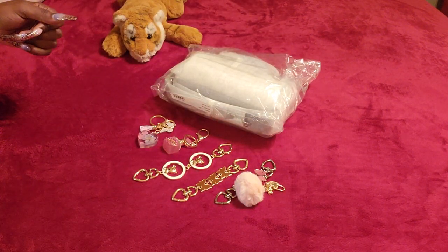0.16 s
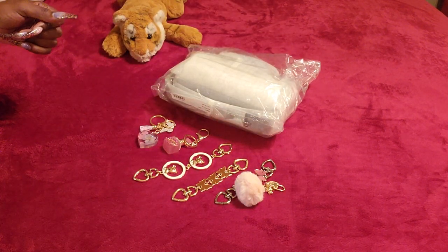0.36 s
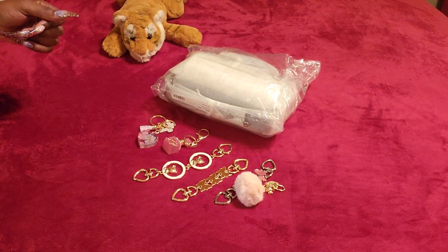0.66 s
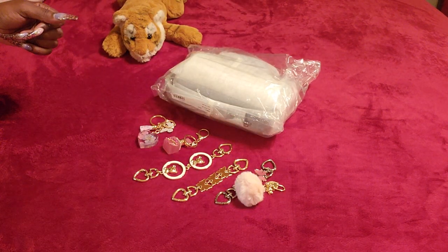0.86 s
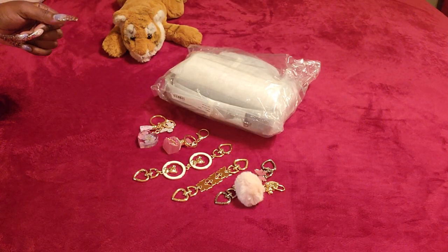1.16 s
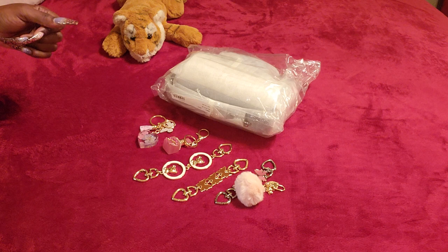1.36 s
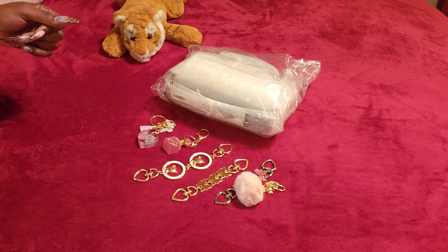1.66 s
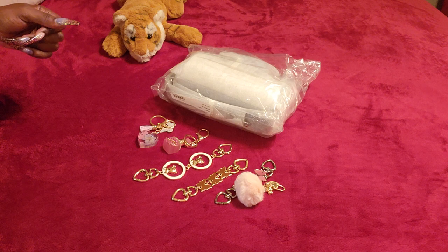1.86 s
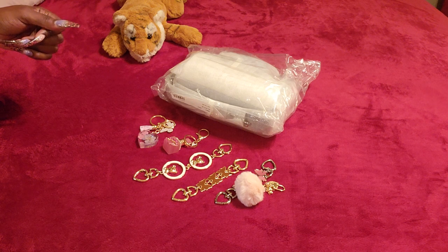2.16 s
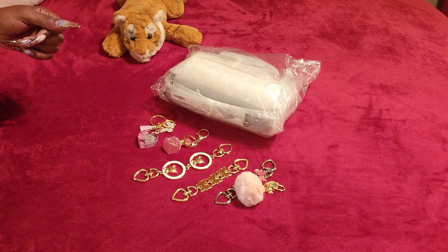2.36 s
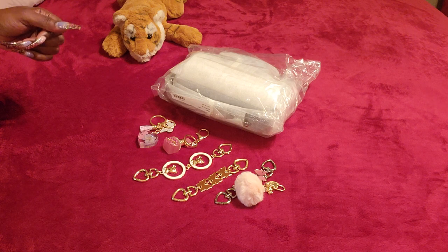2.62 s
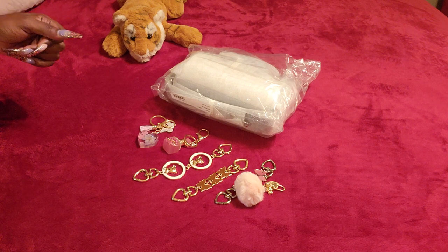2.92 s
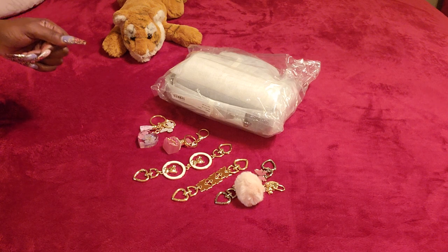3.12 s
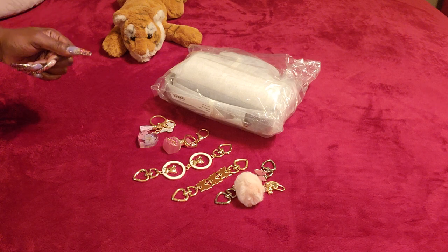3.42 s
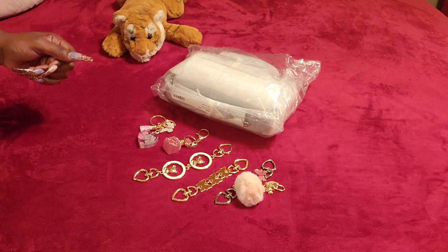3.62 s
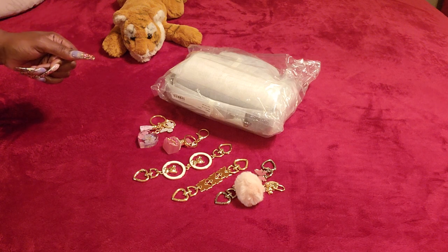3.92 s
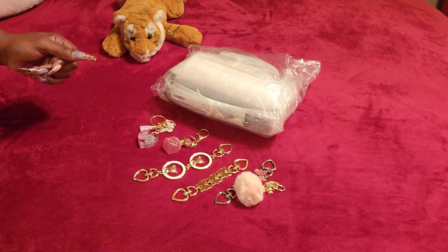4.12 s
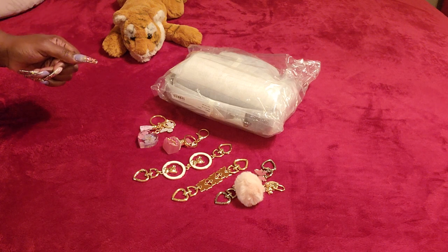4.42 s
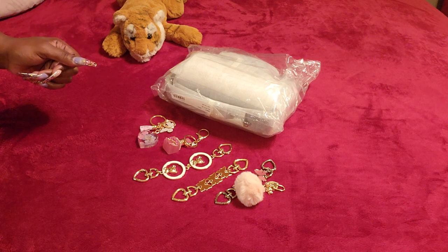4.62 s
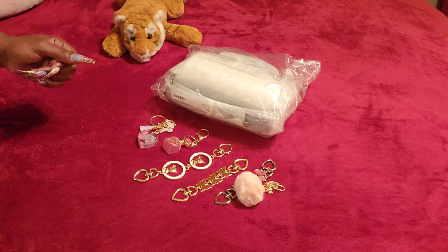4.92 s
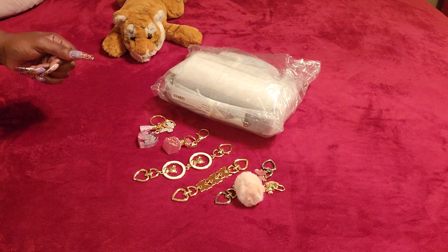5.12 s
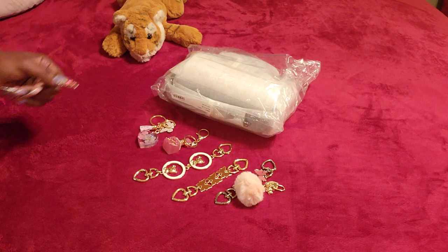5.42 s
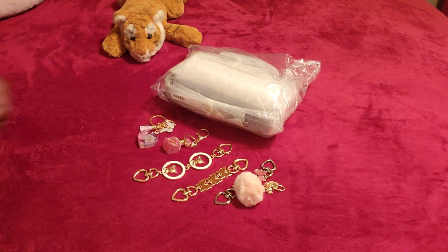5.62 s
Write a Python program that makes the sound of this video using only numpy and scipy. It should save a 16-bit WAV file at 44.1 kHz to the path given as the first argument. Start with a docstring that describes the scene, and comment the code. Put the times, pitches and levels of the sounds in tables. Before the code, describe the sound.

Small metal charms and chains clink and rustle on a soft bed, fading quieter, then a sharp bright jangling burst near the end.

```python
"""Two motors hum out of step far off, then hands turn over small metal charms, chains and clasps beside a phone.
Wrapping and cloth rustle (filtered random grains), a hollow packet booms (grains into low decaying modes).
Chain links jingle (grains into metal modes); ticks are noise scrapes convolved with short decaying partials.
Weight shifts on the bed (low noise). A soft bedroom adds short echoes; the right port is nearer."""
import sys
import numpy as np
from scipy import signal
from scipy.fft import rfft, irfft, next_fast_len
from scipy.io import wavfile

SR = 44100
rng = np.random.default_rng(int(sys.argv[2]) if len(sys.argv) > 2 else 0)


def dump_mix(stems):
    """Bounce the given channels to the path in sys.argv[1] as a 16-bit WAV at rate SR."""
    frames = np.atleast_2d(stems).T  # one column per channel
    limited = np.clip(frames, -1, 1)  # hard clip at full scale
    pcm = np.round(limited * 32767).astype(np.int16)
    wavfile.write(sys.argv[1], SR, pcm)


def natural_amplitude(level_db):
    """Convert a level in decibels to a linear amplitude factor, elementwise."""
    exponent = np.asarray(level_db, float) / 20
    return 10 ** exponent


N = 254870

# Partials of the metal links. Each row: frequency in Hz, relative level in dB, t60 in seconds.
METAL_MODES = [(4220, -29, 0.016), (4950, -11, 0.075), (5840, -6.5, 0.013), (7940, -3.5, 0.022),
               (7710, -3.5, 0.017), (9280, -5.5, 0.083), (10370, -4, 0.019), (11500, -7.5, 0.0083),
               (11200, -7, 0.055), (12220, 7.5, 0.014), (14300, -4.5, 0.027), (15500, -13, 0.067),
               (14400, -5, 0.053), (14800, -22, 0.065)]
# Moves of the hands, each swelling to a peak and dying away. Each row: peak time in seconds, rise in seconds,
# then relative levels in dB of rustle, chain jingle and hollow boom.
HAND_MOVES = [(0.005, 0.023, -39, -27, -42), (0.196, 0.0089, -32.5, -68, -39),
              (0.251, 0.021, -46, -42.5, -38), (0.336, 0.026, -35, -27.5, -39.5),
              (.4, 0.18, -38.5, -33, -37), (0.497, 0.019, -40.5, -58, -40), (.676, 0.11, -58.5, -59, -67.5),
              (0.76, 0.024, -48, -55, -50), (0.838, 0.0046, -34.5, -38, -39),
              (.96, 0.053, -59.5, -77, -64.5), (1.161, .004, -83, -47.5, -78.5),
              (1.268, 0.017, -63.5, -75, -76), (1.331, 0.039, -80, -40, -88),
              (1.443, 0.0073, -32, -25.5, -33), (1.561, 0.042, -50.5, -55, -38),
              (1.628, 0.045, -55, -74, -40), (1.692, 0.0062, -59, -55.5, -75),
              (1.882, 0.07, -45, -61, -34.5), (1.986, 0.097, -46.5, -67, -54),
              (2.037, 0.032, -36.5, -39.5, -43), (2.095, 0.09, -42.5, -45, -50),
              (2.188, 0.062, -77, -69, -55.5), (2.328, 0.023, -47.5, -63, -48.5),
              (2.5, 0.024, -40.5, -46, -44), (2.54, 0.054, -80, -67.5, -80), (2.699, 0.065, -50, -64, -61),
              (2.75, 0.11, -47, -47, -67), (2.799, 0.086, -46.5, -66, -53), (2.87, 0.1, -57, -66, -63.5),
              (3.029, 0.033, -57, -66, -71), (3.077, 0.036, -55.5, -61, -74),
              (3.146, 0.15, -72.5, -61, -56), (3.377, 0.048, -54.5, -58, -82),
              (3.434, 0.047, -45.5, -49, -53), (3.562, 0.14, -62, -63, -70),
              (3.644, 0.058, -55, -67, -46.5), (3.7, 0.078, -59, -57, -52.5),
              (3.771, 0.084, -46.5, -44.5, -50), (3.852, 0.12, -49.5, -42.5, -56),
              (3.92, 0.17, -59.5, -57, -55.5), (3.985, 0.053, -63, -43, -44), (4.07, 0.1, -69, -52, -54),
              (4.13, 0.092, -58, -54, -56), (4.179, 0.035, -44, -61, -40.5),
              (4.254, 0.052, -52.5, -52.5, -57), (4.33, 0.15, -57, -82, -50), (4.378, 0.033, -52, -47, -54),
              (4.683, 0.02, -47.5, -38, -37), (4.713, 0.032, -41, -66, -34.5),
              (4.77, 0.054, -45.5, -51, -49), (4.83, 0.1, -49.5, -56.5, -44.5),
              (4.893, 0.014, -37.5, -33, -41.5), (4.963, .008, -32.5, -23.5, -38),
              (4.975, .02, -34.5, -25, -32.5), (5.025, 0.01, -20, -11.5, -27),
              (5.058, 0.066, -30.5, -16, -29.5), (5.099, 0.0068, -25.5, -37, -27.5),
              (5.163, .005, -31.5, -16.5, -24.5), (5.176, .015, -27, -24.5, -35.5),
              (5.27, .05, -50, -76, -63), (5.436, .015, -80, -74, -99), (5.525, .04, -73, -67.5, -99),
              (5.57, .04, -67, -73, -97.5), (5.704, 0.12, -76, -57.5, -86), (5.76, 0.078, -72, -54, -92)]


def unit(x):
    """Scales to rms 1."""
    return x / np.sqrt(np.mean(x ** 2))


def band(x, lo_hz, hi_hz):
    """Butterworth band-pass."""
    sos = signal.butter(2, [lo_hz, min(hi_hz, .45 * SR)], "band", fs=SR, output="sos")
    return signal.sosfilt(sos, x)


def colour(x, points, share=1):
    """Shapes the spectrum by (Hz, dB) points on a log frequency axis; share scales the dB."""
    size = next_fast_len(N)
    hz, db = np.transpose(points)
    f_hz = np.arange(size // 2 + 1) * SR / size + 1
    gain = natural_amplitude(share * np.interp(np.log(f_hz), np.log(hz), db))
    return irfft(rfft(x, size) * gain, size)[..., :N]


def ring(push, modes):
    """Sum of two-pole resonators, one per decaying mode, all driven by push."""
    out = 0
    for hz, db, t60_s in modes:
        w = 2 * np.pi * hz / SR
        r = np.exp(-np.log(1000) / (t60_s * SR))
        out = out + natural_amplitude(db) * signal.lfilter([np.sin(w)], [1, -2 * r * np.cos(w), r * r], push)
    return out


def grains(rate_hz, spread_db):
    """Random tiny contacts, a few much stronger than the rest; rms 1."""
    hit = rng.random(N) < rate_hz / SR
    size = rng.exponential(size=N)
    sign = rng.standard_normal(N)
    return unit(hit * sign * natural_amplitude(spread_db * size))


def swells(peak_s, rise_s, db, fall_db_s):
    """Gain over time of moves that rise steadily in dB and fall at one rate; their powers add."""
    hop = 64
    t = np.arange(0, N + hop, hop)[:, None] / SR - peak_s
    rise_db = 22 * t / np.maximum(rise_s, .003)  # rise_s covers the last 22 dB
    power = natural_amplitude(2 * (db + np.where(t < 0, rise_db, -fall_db_s * t))).sum(axis=1)
    return np.interp(np.arange(N), hop * np.arange(len(t)), np.sqrt(power))


def background():
    """Two motor hums beat against each other over low rumble and faint hiss; the bass is alike at both ports."""
    # Each row: frequency in Hz, level in dB rms.
    motors = [(59.37, -52.6), (56.56, -59.2)]
    # Each row: frequency in Hz, relative level in dB.
    air_spectrum = [(15, -42), (25, -16.5), (76, -11), (120, -12), (236, -24), (301, -37.5), (900, -56),
                    (2000, -61.5), (3720, -57), (5880, -52), (6920, -56.5), (8360, -54), (10700, -56.5),
                    (12900, -50.5), (16000, -78.5)]
    in_step_s, air_db = 1.35, -61.5
    t = np.arange(N) / SR - in_step_s
    hum = sum(np.sqrt(2) * natural_amplitude(db) * np.cos(2 * np.pi * hz * t) for hz, db in motors)
    mid, side = colour(rng.standard_normal((2, N)), air_spectrum)
    side = signal.lfilter([1, -1], [1, -.95], side)  # high-pass
    return hum + natural_amplitude(air_db) * unit(mid + side * np.array([[1], [-1]]))


def rustle():
    """Wrapping and cloth: dense crinkles, coloured, swelling with each move."""
    # Each row: frequency in Hz, relative density in dB per Hz.
    rustle_spectrum = [(530, -44), (900, 9.5), (1080, 4), (1810, 9.5), (3070, 6), (6110, 0), (8870, -34.5),
                       (14000, -28), (16000, -31)]
    peak_s, rise_s, rustle_db, _, _ = np.transpose(HAND_MOVES)
    crinkle = unit(colour(grains(2500, 1.95), rustle_spectrum))
    return natural_amplitude(-5.5) * swells(peak_s, rise_s, rustle_db, 377.5) * crinkle


def jingle():
    """Chain links brush each other: grains ring the metal modes and add two bands of contact noise."""
    peak_s, rise_s, _, jingle_db, _ = np.transpose(HAND_MOVES)
    links = natural_amplitude(-12) * swells(peak_s, rise_s, jingle_db, 454.5) * grains(2500, 3.0)
    ringing = natural_amplitude(-26) * ring(links, METAL_MODES)
    brush = natural_amplitude(3.5) * band(links, 3600, 14000)
    edge = natural_amplitude(7.5) * band(links, 11500, 16000)
    return ringing + brush + edge


def boom():
    """Hollow packet: knocks excite its low decaying modes, plus a band of duller contact noise."""
    # Each row: frequency in Hz, relative level in dB, t60 in seconds.
    packet_modes = [(326.2, -20, 0.14), (420, -24.5, 0.023), (481, -4, 0.15), (515, -3.5, 0.035),
                    (689, -2.5, 0.049), (855, -22.5, 0.14)]
    peak_s, rise_s, _, _, boom_db = np.transpose(HAND_MOVES)
    knocks = natural_amplitude(-7.5) * swells(peak_s, rise_s, boom_db, 366) * grains(1000, 2.2)
    return natural_amplitude(-21.0) * ring(knocks, packet_modes) + natural_amplitude(8.0) * band(knocks, 440, 1000)


def bed():
    """Weight shifting on the bed: low noise follows the boom, more evenly; a few shoves are heavier and deeper."""
    # Each row: peak time in seconds, rise in seconds, relative level in dB.
    shoves = [(.4, 0.22, -45), (1.689, 0.099, -46), (2.04, 0.052, -48), (5.06, 0.15, -45.5)]
    fall_db_s = 205.5
    peak_s, rise_s, _, _, boom_db = np.transpose(HAND_MOVES)
    shift_gain = swells(peak_s, rise_s, -30 + 0.72 * boom_db, fall_db_s)
    shift = shift_gain * unit(band(rng.standard_normal(N), 120, 210))
    shove_gain = swells(*np.transpose(shoves), fall_db_s)
    shove = shove_gain * unit(band(rng.standard_normal(N), 105, 160))
    return natural_amplitude(-6.5) * (shift + shove)


def ticks():
    """Each tick is a sharp contact and a short scrape; it strikes another link, at a new spot, every time."""
    # The clearest ticks. Each row: start in seconds, relative level in dB, thud and snap in dB against that level,
    # pitch in Hz of the piece that is struck.
    tick_list = [(0.1623, -37, -34, -26, 12300), (0.1926, -19, -22.5, -16, 4000),
                 (0.2418, -32, -4, -12, 13000), (0.2673, -30, -25, -17, 12700),
                 (0.336, -32, -15, -14, 11900), (0.3857, -18, -18.5, -30, 4640),
                 (0.4314, -34, -22, -28, 14200), (0.4502, -33, -32, -6.5, 4700),
                 (0.4751, -34, -4, -6, 12600), (0.4884, -26, -53, -3, 4200), (0.5427, -33, -20, -42, 4680),
                 (0.653, -38, -30.5, -27.5, 14200), (0.6716, -43.5, -20.5, -21.5, 14200),
                 (0.707, -42, -17, -19.5, 4200), (0.7602, -25.5, -28.5, -15.5, 11800),
                 (0.8357, -27.5, -6, -2.5, 11500), (0.855, -37, -8, -5.5, 14200),
                 (0.9275, -49, 1, -32, 12600), (0.9449, -49, -6.5, -3, 5700),
                 (1.0122, -52, -22.5, -33, 5700), (1.056, -58, -19.5, -12, 5930),
                 (1.1559, -37, -50, -38, 9800), (1.2394, -47, -24, -26.5, 8900),
                 (1.261, -40, -42, -41, 6240), (1.3058, -29, -60, -63, 12200),
                 (1.3154, -40, -55, -47, 9500), (1.3331, -29, -63, -61, 14500),
                 (1.4192, -46, -25, -32, 14300), (1.4386, -24, -10.5, -7, 4470),
                 (1.5324, -35.5, -8, -21, 13600), (1.6272, -35.5, -28, -4, 5560),
                 (1.691, -35.5, -17.5, -22, 7750), (1.821, -33.5, -25, -18, 8030),
                 (1.8708, -33.5, -3.5, -6.5, 14400), (1.9615, -49, -14, -5, 4150),
                 (1.9788, -41, -4, -27, 13800), (2.0162, -43.5, 5.5, -7, 5010),
                 (2.0338, -49, -25, -17, 14200), (2.3204, -48, 0, -7, 4840),
                 (2.3353, -45.5, -17, 3.5, 3900), (2.493, -41.5, -7, -11, 3750),
                 (2.6895, -37, -32, -23, 5910), (2.7048, -37.5, -26, -18, 6800),
                 (2.7656, -35, -28, -23, 6320), (2.7847, -29.5, -20, -14.5, 14000),
                 (2.8502, -43, -7.5, -6.5, 14200), (2.8759, -51, -10, -10, 14300),
                 (3.015, -40, -26, -20, 3920), (3.0656, -45.5, -10, -11, 4200),
                 (3.1532, -47.5, -9.5, -18, 9600), (3.3389, -56, -13, -6, 4290),
                 (3.3704, -45, -25, -11, 4440), (3.4026, -36.5, -34, -14.5, 4420),
                 (3.4321, -41, -9.5, -8.5, 14400), (3.4694, -45, -7, -6.5, 3500),
                 (3.5478, -55, -17.5, -6.5, 3900), (3.5825, -50, -5.5, -7, 4220),
                 (3.6185, -49, -2.5, -6, 12100), (3.6596, -40.5, -13, -14, 5170),
                 (3.7189, -44, -23, -21, 14500), (3.7465, -43, -21, -13, 4400),
                 (3.7738, -35, -16, -9.5, 14100), (3.8062, -32.5, -21, -17.5, 4570),
                 (3.8414, -51, -21, -23, 12300), (3.9514, -37, -35, -29, 12700),
                 (3.9784, -38, -32, -30, 4720), (3.987, -25.5, -40, -56, 10170),
                 (4.0229, -37.5, -18.5, -23, 8000), (4.0855, -43.5, -2, -4.5, 4670),
                 (4.1215, -43, -28, -26, 7690), (4.1615, -30.5, -14, -45, 4310),
                 (4.1746, -21.5, -24, -54, 4700), (4.251, -47, -15, -13, 8260),
                 (4.2694, -47, -16, -10, 12400), (4.334, -33, -32, -19, 9340), (4.366, -32, -26, -25, 9500),
                 (4.3771, -40.5, -5.5, -6.5, 12670), (4.6693, -40, -16, -26.5, 5080),
                 (4.693, -35.5, -13, -12.5, 6150), (4.725, -30, -32, -16, 6160),
                 (4.7421, -31, -5, -14, 5870), (4.8049, -41.5, -2, 7, 3750), (4.8584, -43, -17, -11, 14400),
                 (4.8908, -20, -21, -24, 12050), (4.9381, -28.5, -22, -9.5, 4040),
                 (4.9508, -17, -18.5, -12, 12300), (4.969, -16, -12, -11.5, 14200),
                 (5.02, -12, -7, -17.5, 14400), (5.0575, -14, -17.5, -12.5, 4220),
                 (5.0948, -10.5, -12.5, -14, 12200), (5.1522, -14.5, -23, -15.5, 6100),
                 (5.1625, -12, -16.5, -14.5, 12700), (5.1722, -9.5, -18.5, -14.5, 14400),
                 (5.3318, -52.5, -14.5, -4, 4060), (5.4306, -56.5, -17, -19.5, 5990),
                 (5.5124, -51.5, -30.5, -16.5, 11470), (5.5414, -48.5, -17.5, -11, 13450),
                 (5.5598, -51, -27, -20, 12350), (5.673, -48, -40, -26, 13000),
                 (5.7092, -41.5, -44, -42, 8220)]
    scrape_ms, scrape_spread, contact_ms, contact_db = 1.67, 0.12, 0.22, -1  # decay constants
    chain_db, piece_db, piece_t60_s = -17.5, -13, 0.02
    top_db_per_octave = 4.5  # larger, lower pieces give less of the top octave and shake the chain less
    thud, snap, edge, top, metal = np.zeros((5, N))
    t = np.arange(4096) / SR
    hz, db, t60_s = np.transpose(METAL_MODES)[:, :, None]
    for start_s, level_db, thud_db, snap_db, piece_hz in tick_list:
        i = int(start_s * SR)
        decay_ms = max(scrape_ms * np.exp(scrape_spread * rng.standard_normal()), .2)
        envelope = np.exp(-1000 * t / decay_ms) + natural_amplitude(contact_db) * np.exp(-1000 * t / contact_ms)
        push = (natural_amplitude(level_db) * rng.standard_normal(len(t)) * envelope)[:N - i]
        at = slice(i, i + len(push))
        thud[at] += natural_amplitude(thud_db) * push
        snap[at] += natural_amplitude(snap_db) * push
        edge[at] += push
        shine_db = top_db_per_octave * np.log2(piece_hz / 12000)
        top[at] += natural_amplitude(shine_db) * push
        # links differ a little in size, so their partials never land twice on the same pitch
        spot, size = rng.standard_normal((2, len(METAL_MODES), 1))
        partial_gain = natural_amplitude(db + 3 * spot - 60 * t / t60_s)
        chain = np.sum(partial_gain * np.sin(2 * np.pi * hz * (1 + .008 * size) * t), axis=0)
        piece = natural_amplitude(piece_db - 60 * t / piece_t60_s) * np.sin(2 * np.pi * piece_hz * t)
        link = natural_amplitude(chain_db + shine_db) * chain + piece
        metal[at] += signal.fftconvolve(push, link)[:len(push)]
    dull = natural_amplitude(19.5) * band(thud, 440, 960) + natural_amplitude(15) * band(snap, 990, 3940)
    bright = natural_amplitude(-1.5) * band(edge, 3210, 9900) + natural_amplitude(0.5) * band(top, 8700, 16500)
    return dull + bright + natural_amplitude(-14) * metal


def room(x):
    """Short dense echoes off walls and bed; the treble dies first and differs between the ports."""
    low_t60_s, top_t60_s, level_db = 0.19, 0.13, -0.5
    count, step_s = 6, .04
    t = np.arange(int(.4 * SR)) / SR
    # hands and charms keep moving, so every 40 ms the echoes take other paths
    place = (np.arange(N) / SR / step_s) % count
    out = 0
    for k in range(count):
        distance = np.abs((place - k + count / 2) % count - count / 2)
        share = np.clip(1 - distance, 0, 1)
        shared, *apart = rng.standard_normal((3, len(t)))
        noise = apart + signal.lfilter([.06], [1, -.94], shared - apart)  # bass shared by both ports
        low = signal.lfilter([.3], [1, -.7], noise)
        tail = low * natural_amplitude(-60 * t / low_t60_s) + (noise - low) * natural_amplitude(-60 * t / top_t60_s)
        tail = tail * np.clip((t - .001) / 0.0016, 0, 1)  # 1 ms gap, 1.6 ms onset
        tail = natural_amplitude(level_db) * tail / np.sqrt(np.sum(tail ** 2, axis=1, keepdims=True))
        out = out + signal.fftconvolve(np.sqrt(share) * x[None], tail, axes=1)[:, :N]
    return out


def scene():
    """Mixes all layers; the near sound reaches the right port first and each port colours it differently."""
    # Left-over-right difference. Each row: frequency in Hz, difference in dB.
    port_difference = [(60, -4.5), (110, 6), (200, -4.5), (380, 2), (700, -1.5), (1290, 0), (2380, -0.5),
                       (4400, -2), (8120, -1), (15000, -7)]
    left_lag = 21  # samples
    near = ticks() + rustle() + jingle() + boom() + bed()
    left = np.r_[np.zeros(left_lag), near[:-left_lag]]
    both = np.array([left, near]) + room(near)
    ported = [colour(x, port_difference, share) for x, share in zip(both, (.5, -.5))]
    return np.array(ported) + background()


def low_pass(x):
    """Removes everything above the highest recorded frequency."""
    return signal.sosfilt(signal.butter(12, 16480, fs=SR, output="sos"), x)


def record(dry):
    """The phone cuts the top with a steep elliptic low-pass at 15.3 kHz."""
    mix = signal.sosfilt(signal.ellip(8, .2, 60, 15300, fs=SR, output="sos"), dry)
    return low_pass(mix)


dry = scene()
out = record(dry)
dump_mix(out)
```